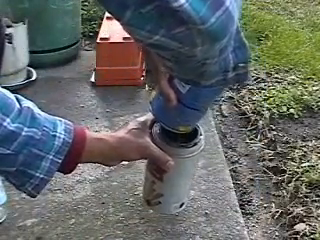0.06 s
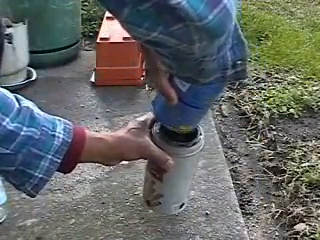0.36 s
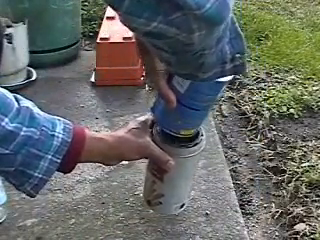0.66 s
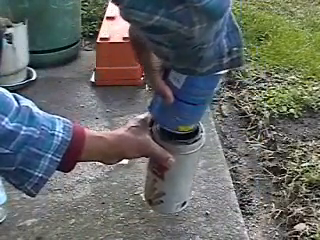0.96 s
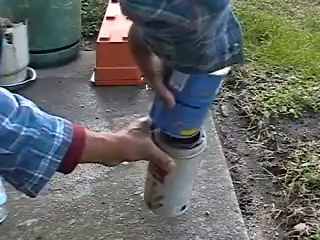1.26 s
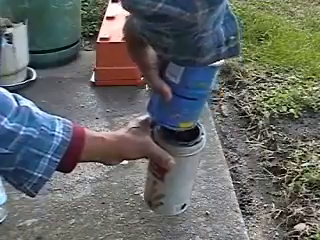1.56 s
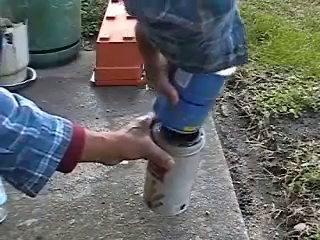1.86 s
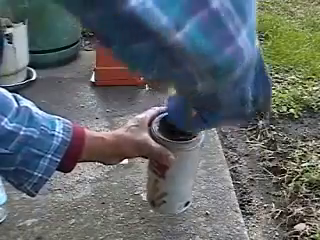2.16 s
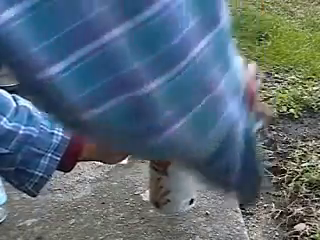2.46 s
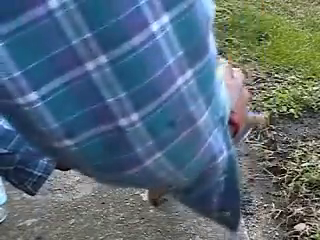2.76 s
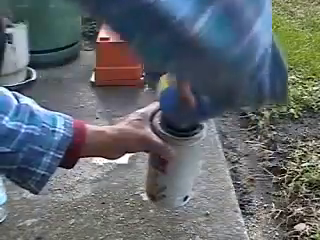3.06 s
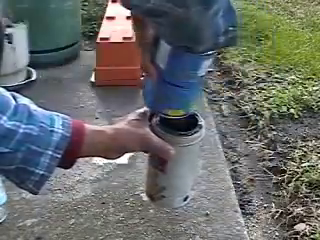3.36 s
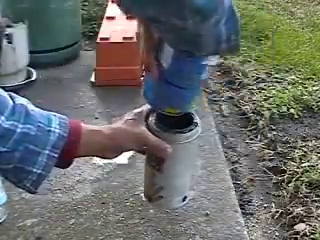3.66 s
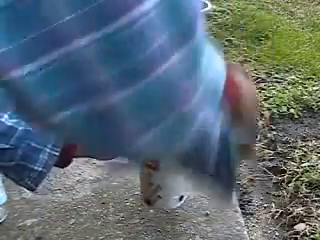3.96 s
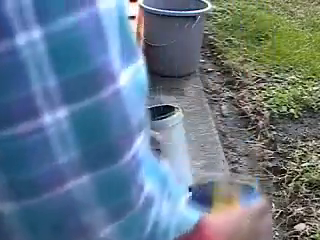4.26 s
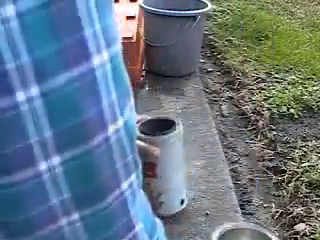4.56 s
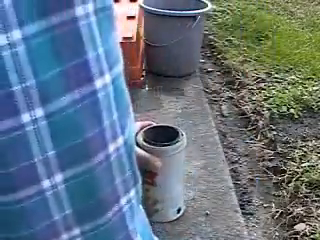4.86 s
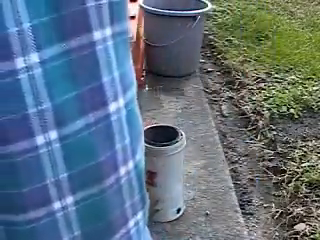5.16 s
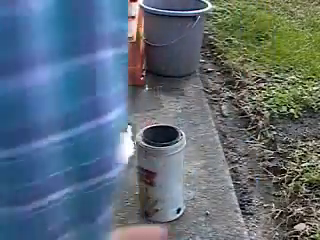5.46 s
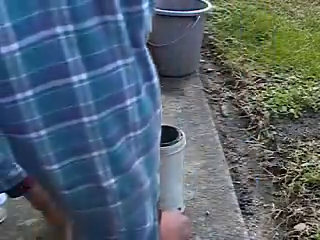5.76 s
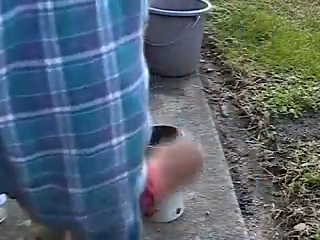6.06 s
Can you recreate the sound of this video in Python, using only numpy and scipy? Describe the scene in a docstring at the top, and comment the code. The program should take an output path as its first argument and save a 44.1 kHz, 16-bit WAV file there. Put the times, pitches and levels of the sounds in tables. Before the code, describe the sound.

A plastic jar shakes rattling pellets into a metal can stove, which rings briefly and is then thumped on the ground.

```python
"""Outdoors, over a distant rumble, wood pellets rattle in a plastic jar and are shaken into a tin-can stove. As
the jar is upended its neck grinds and clinks on the stove, then catches the rim, so that the wall of the can
rings in its modes until a hand damps it. Sleeves brush, and something scrapes over the concrete by stick-slip
friction. Last, the stove is knocked on the ground to settle the fuel: its laden base thuds and the thin tin
clanks."""
import sys
import numpy as np
from scipy import signal
from scipy.fft import rfft, irfft
from scipy.io import wavfile
from scipy.ndimage import uniform_filter1d

SR = 44100
rng = np.random.default_rng(int(sys.argv[2]) if len(sys.argv) > 2 else 0)


def output_pcm(signal):
    """Save a mono or channel-first signal as 16-bit PCM at the path in sys.argv[1].

    Samples are clipped to [-1, 1] before scaling.
    """
    pcm = np.clip(np.atleast_2d(signal).T, -1, 1) * 32767
    wavfile.write(sys.argv[1], SR, np.round(pcm).astype(np.int16))


N = 268564
TIME = np.arange(N) / SR
DETUNE = 0.0075  # relative scatter of resonances with the point of contact

# small pellets striking the jar: t/s, level/dB
RATTLES = [(0.066, -35.5), (0.091, -34.5), (0.2787, -34.5), (0.2945, -39), (0.307, -53), (0.394, -37),
           (0.4035, -36), (0.4203, -31.5), (0.5045, -33), (0.547, -34), (0.584, -33.5), (0.5923, -26),
           (0.605, -29), (0.68, -38), (0.768, -47), (0.9087, -50), (1.16, -43), (1.274, -43), (1.462, -54),
           (1.508, -39), (1.8, -40.5), (1.9927, -42), (2.142, -52), (2.743, -40), (2.943, -45),
           (3.005, -46), (3.46, -35.5), (4.084, -53)]
# knocks of the jar's neck: t/s, level/dB, decay time/s, tilt/(dB/octave), hollow bass/dB, high ring/dB
CLINKS = [(1.051, -41, 0.003, -2.5, -3, 16), (1.2108, -22.5, 0.0036, 6, 11.5, 14),
          (1.3033, -21, 0.0056, 1, 9.5, 15), (1.391, -25, 0.0036, 8.5, 17, -15),
          (1.723, -32.5, 0.0068, 0.5, 10.5, 9), (1.83, -25.5, 0.005, 0.5, 0, 6),
          (1.8335, -14.5, 0.007, 3, -1, 3), (1.846, -20, 0.0068, 3.5, 11, 22),
          (1.868, -29.5, 0.0033, 0, -1, 14), (1.92, -27, 0.018, -1.5, 0, 14),
          (1.936, -27.5, 0.0042, 1, 2, 16), (2.0404, -29, 0.0086, 1.5, -6, 9),
          (2.0686, -36.5, 0.013, -3.5, -4, 12), (2.2277, -26.5, 0.012, -0.5, -5, 23),
          (2.24, -26, 0.011, -0.5, -17, 14), (2.7501, -21, 0.0075, -1.5, 0.5, 19),
          (2.7618, -13, 0.0043, 3, -4, 10), (2.8691, -32.5, 0.0046, -2, -9, 20),
          (3.0795, -27.5, 0.011, 6.5, -4, 7), (3.1006, -30, 0.013, 0.5, -14, 10),
          (3.1608, -28, 0.013, 6.5, 2, 9), (3.274, -24.5, 0.006, 12.5, 26, 19),
          (3.3452, -32.5, 0.0028, -1, -9, 1), (3.37, -32, 0.00063, 0.5, 1, 7),
          (3.393, -22.5, 0.0057, -0.5, -1, 16.5), (3.4227, -21, 0.0078, 1.5, -3.5, 13),
          (4.25, -34, 0.0074, 1, 3, 11)]


def amp(db):
    """Amplitude ratio of a level in decibels."""
    return 10 ** (np.asarray(db) / 20)


def unit(x):
    """Normalisation to an rms of one."""
    return x / np.sqrt(np.mean(x ** 2) + 1e-20)


def add(mix, s, sound):
    """Superposition: a sound joins the mix at time s."""
    part = mix[max(round(s * SR), 0):][:len(sound)]
    part += sound[:len(part)]


def body(x, colour, peaks=(), size=8192):
    """Minimum-phase filter of unit energy: colour (f/Hz, level/dB) plus peaks (f/Hz, width/Hz, gain/dB)."""
    hz = abs(np.fft.fftfreq(size, 1 / SR))
    points, levels = np.transpose(colour)
    db = np.interp(np.log(hz + 1), np.log(points), levels)
    for centre, width, height in peaks:
        db = db + height / (1 + (2 * (hz - centre) / width) ** 2)
    spectrum = np.exp(np.conj(signal.hilbert(np.log(amp(db)))))
    response = np.fft.ifft(spectrum).real[:size // 2]
    return signal.oaconvolve(x, response / np.linalg.norm(response))[:len(x)]


def grains(per_s, spread_db, count):
    """Poisson process: tiny impacts of random moment, sign and size."""
    sizes = amp(spread_db * np.minimum(rng.exponential(1, count), 4)) * rng.choice([-1, 1], count)
    return sizes * (rng.random(count) < per_s / SR)


def burst(db, decay_s, tilt_db, per_s, rise_s, linger, count=6000):
    """Shot noise that swells and decays, with stragglers; db is its energy as a level over 10 ms."""
    t, hz = np.arange(count) / SR, np.fft.rfftfreq(count, 1 / SR)
    envelope = (1 - np.exp(-t / rise_s)) * (np.exp(-t / decay_s) + linger * np.exp(-t / 0.013))
    impacts = np.pad(grains(per_s, 2, count) * envelope, (64, 0))[:count]
    octaves = np.log2(np.clip(hz, 1200, 12000) / 6500)
    tilted = irfft(rfft(impacts) * amp(tilt_db * octaves), count)[64:]
    return amp(db) * tilted / np.linalg.norm(tilted) * np.sqrt(SR / 100)


def swells(rows, rise_db_per_s, fall_db_per_s):
    """Incoherent sum of envelopes that grow and decay exponentially about their peaks (t/s, level/dB)."""
    power = 0
    for s, db in rows:
        drop_db = np.maximum((s - TIME) * rise_db_per_s, (TIME - s) * fall_db_per_s)
        power += amp(db - drop_db.clip(0, 120)) ** 2
    return np.sqrt(power)


def air():
    """Filtered noise: a distant rumble whose narrow peaks give a low hum and a faint high tone."""
    # outdoor spectrum: f/Hz, level/dB
    colour = [(15, -49), (25, -10), (97, -0.5), (383, -12), (953, -8.5), (2130, -17.5), (2370, -24),
              (5440, -37), (11000, -30), (12500, -44.5), (22000, -110)]
    # its peaks: f/Hz, width/Hz, gain/dB
    peaks = [(102.8, 6.5, 9.2), (180, 137, 2.75), (2362, 18, 22.3)]
    return amp(-47) * unit(body(rng.standard_normal(N), colour, peaks))


def flow():
    """Granular flow: the wake of each jolt, the slides of the heap and a slow creep add in power."""
    # tilts of the jar that let the heap slide: t/s, level/dB
    tilts = [(0.395, -41), (0.56, -38.5), (1.163, -38), (1.286, -31.5), (1.71, -44), (1.93, -48),
             (2.145, -40.5), (2.365, -43), (2.605, -49), (2.82, -32), (3.49, -41.5)]
    creep_db, pour_end_s = -64.5, 2.9
    # a harder jolt loosens more pellets
    jolts = [(s, -44.5 + 0.5 * (db + 31)) for s, db, *_ in RATTLES + CLINKS]
    wakes = swells(jolts, rise_db_per_s=789, fall_db_per_s=226)
    slides = swells(tilts, rise_db_per_s=335, fall_db_per_s=190)
    return np.sqrt(wakes ** 2 + slides ** 2 + amp(creep_db) ** 2 * (TIME < pour_end_s))


def trickle(level):
    """Modulated shot noise: sliding wood catches and slips in clumps over a thin bed of grains."""
    clump_s, bed = 0.0025, 0.3
    contacts = abs(grains(per_s=300, spread_db=-1, count=N))
    clumps = bed + signal.lfilter([1], [1, -np.exp(-1 / (clump_s * SR))], contacts)
    return level * unit(clumps * grains(per_s=9000, spread_db=2.5, count=N))


def pellets(running):
    """Source and filter: rattles and trickle excite the hollow plastic jar, and heavier pieces clack."""
    # response of the jar: f/Hz, level/dB
    colour = [(100, -29), (450, 3.5), (850, -7.5), (1500, 5.5), (2800, 2), (5200, -5), (6700, 2.5),
              (9000, 0.5), (12500, -1.5)]
    # its resonances: f/Hz, width/Hz, gain/dB
    peaks = [(1680, 300, 2.3), (2297, 49, 5.9), (3280, 55, 11.4), (8340, 270, 2.8)]
    # heavy pieces striking its wall, and at 4.109 s the jar knocking as it is set down: t/s, level/dB, f/Hz
    heavy_hits = [(0.066, -13.5, 1730), (0.0917, -6.5, 1830), (0.107, -10, 1700), (0.1425, -9, 1600),
                  (0.354, -18.5, 1750), (0.5924, -18, 2030), (0.606, -3.5, 1580), (0.6804, -13, 1740),
                  (0.7184, -8, 1700), (0.766, -12, 2200), (0.7823, -7.5, 1800), (0.815, -15.5, 1600),
                  (0.891, -14, 1640), (0.938, -19.5, 1700), (1.305, -22, 1480), (1.508, -14.5, 1460),
                  (1.9933, -11.5, 1660), (2.04, -9.5, 2300), (2.07, -11, 1585), (3.484, -10, 1790),
                  (3.506, -8, 1890), (4.109, -16.5, 1960)]
    drive, clacks = amp(5.5) * trickle(running), np.zeros(N)
    for s, db in RATTLES:
        tilt_db = 0.04 * (db + 63)  # harder is brighter
        rattle = burst(db, decay_s=0.0051, tilt_db=tilt_db, per_s=10000, rise_s=0.0003, linger=0.17)
        add(drive, s, amp(4.5) * rattle)
    for s, db, hz in heavy_hits:
        add(clacks, s, clack(db, hz))
    return body(drive, colour, peaks) + clacks


def clack(db, hz, count=4096):
    """Impact with rebounds: a hard piece excites its own pitch and the jar's wall; its edge crunches."""
    # spectrum of the impact: f/Hz, level/dB
    colour = [(100, -48), (900, -12), (1500, 0), (3200, -9), (4500, -34), (12500, -24)]
    # resonances of the jar's wall: f/Hz, width/Hz, gain/dB
    wall_peaks = [(2340, 180, 10), (3305, 130, 12)]
    hit = 0.13 * grains(per_s=5300, spread_db=-1.5, count=count) * np.exp(-np.arange(count) / SR / 0.012)
    hit[0] = 1  # first contact, ahead of the chatter
    crunch = burst(-35.5, decay_s=0.0034, tilt_db=0.5, per_s=10000, rise_s=0.0005, linger=0.1)[:count]
    peaks = [(centre * (1 + 2 * DETUNE * rng.standard_normal()), width, height)
             for centre, width, height in wall_peaks]
    return amp(db) * (body(hit, colour, peaks + [(hz, 240, 11)]) + crunch)


def neck(running):
    """Damped resonance: the hand-held jar's neck chatters on the stove, each contact in its own colour."""
    # response of the neck: f/Hz, level/dB
    colour = [(100, -21.5), (430, -6.5), (800, -6.5), (1500, -6), (2700, -5.5), (3800, 1), (5300, -2.5),
              (7600, 1), (10000, -2), (12500, -3.5)]
    # its resonances and dips: f/Hz, width/Hz, gain/dB
    resonances = [(430, 80, 14), (615, 60, 13.5), (1065, 60, 13.5), (1593, 350, 14.5), (3076, 120, 8),
                  (3528, 190, 11), (4120, 240, 7), (4600, 255, 3), (5490, 290, -11), (6600, 210, -4),
                  (7770, 530, 5)]
    # loose grains stir the resonances less than a knock does
    weaker = [(hz, width, 0.98 * db) for hz, width, db in resonances]
    sound = amp(-0.5) * body(trickle(running), colour, weaker)
    for s, db, decay_s, tilt_db, hollow_db, ring_db in CLINKS:
        peaks = np.array(resonances + [(6175, 260, ring_db), (450, 350, hollow_db)])
        peaks[:, 0] *= 1 + DETUNE * rng.standard_normal(len(peaks))
        knock = burst(db, decay_s, tilt_db, per_s=11000, rise_s=0.0013, linger=0.062)
        add(sound, s, amp(0.5) * body(knock, colour, peaks))
    return sound


def mode(hz, t60, count):
    """Free vibration of a damped oscillator, falling by 60 dB in t60 seconds."""
    t = np.arange(count) / SR
    return np.sin(2 * np.pi * hz * t) * 10 ** (-3 * t / t60)


def stove(count=32000):
    """Modal superposition: a blow cracks, rings the wall and thumps the base; dense high modes clank."""
    # blows: t/s, place (0 rim, 1 foot), wall ring/dB, base thud/dB, crack/dB, build-up of the thud/s
    blows = [(2.7635, 0, -24.5, -36, -26, .0003), (2.8676, 0, -31.5, -58, -58, .0003),
             (4.7717, 0.3, -48, -6.5, -13.5, .0003), (4.852, 1, -56, -15, -44, .006),
             (4.887, 1, -56, -16, -39, .007), (4.9475, 1, -56, -12, -31, .002),
             (4.96, 1, -62, -11.5, -39, .003), (5.1085, 1, -19.5, -24, -19, .0003),
             (5.119, 1, -40, -21, -42, .002), (5.133, 1, -48, -12, -55, .003),
             (5.242, 1, -52, -27, -52, .006)]
    # modes of the can's wall: f/Hz, T60/s, level struck at the rim/dB, level struck at the foot/dB
    wall_modes = [(470, 0.4, -17, 7), (614, 0.36, -4.5, 0), (941.5, 1.15, -2, 0.5), (1076.5, .56, 2, 0),
                  (1525, .8, -6, -14), (1840, .72, -2, -3.5), (2097, 0.48, -16, -1), (2754, 0.38, -10, -36),
                  (3605, 0.48, -7, -22), (4204, .36, -14, -30), (5023, 0.32, -11, -22),
                  (5535, .36, -17, -26)]
    # modes of the fuel-laden base: f/Hz, level/dB, T60/s
    base_modes = [(455, -5.5, 0.085), (532.5, 2, 0.055), (578, 2, 0.02), (1173, -2, 0.05)]
    # spectrum of the contact crack: f/Hz, level/dB
    crack_colour = [(100, -12), (500, 16.5), (1200, 23.5), (2100, 6), (3300, 1), (4800, -32), (6200, -9),
                    (9300, -3), (12500, -6)]
    # response of the thin tin: f/Hz, level/dB
    tin_colour = [(300, -48), (1300, 16.5), (2200, 8), (2850, -9), (3400, 3.5), (4900, 0.5), (6600, -7.5),
                  (12000, -2.5)]
    # its resonances: f/Hz, width/Hz, gain/dB
    tin_peaks = [(3500, 200, 6.9), (5560, 450, 10), (7870, 480, 16), (9260, 370, 15)]
    grip_s, grip_db_per_s = 3.2, 54  # the hand tightens and damps the ring
    softening_db = 2.5  # a slow push stirs upper modes less: loss per extra cycle within the build-up
    overtone_t60, lowest_hz = 0.26, base_modes[0][0]
    metal, cracks, clanks = np.zeros((3, N))
    t = np.arange(count) / SR
    push = 1 - np.exp(-t / 0.0007)  # the contact force takes a moment to build
    overtones = sum(rng.choice([-1, 1]) * mode(hz, overtone_t60, count)
                    for hz in rng.uniform(3105, 11870, size=70))
    for s, foot, wall_db, base_db, crack_db, build_s in blows:
        sag, damping = 1 - 0.01 * foot, 1 + 2.4 * foot  # on the ground the wall rings lower and shorter
        wall = sum((-1) ** k * amp(rim_db + foot * (foot_db - rim_db))
                   * mode(hz * sag, t60 / damping, count)
                   for k, (hz, t60, rim_db, foot_db) in enumerate(wall_modes))
        thud = sum((-1) ** k * amp(db - softening_db * build_s * (hz - lowest_hz)) * mode(hz, t60, count)
                   for k, (hz, db, t60) in enumerate(base_modes))
        jitter = unit(uniform_filter1d(rng.standard_normal(count), size=260))
        buzz = 1 + 0.25 * (1 - foot) * jitter  # loose fuel buzzes on the ringing wall
        grip = amp(-grip_db_per_s * np.maximum(s + t - grip_s, 0) * (s < grip_s))
        add(metal, s, amp(wall_db) * push * buzz * grip * wall)
        add(metal, s, amp(base_db) * (1 - np.exp(-t / build_s)) * thud)
        # only a hard knock shakes the slab
        add(metal, s, amp(2 * crack_db + 3) * mode(hz=45.3, t60=0.029, count=4000))
        crack = burst(crack_db, decay_s=0.003, tilt_db=2, per_s=12000, rise_s=0.0014, linger=0.027)
        add(cracks, s, crack)
        clash_db = wall_db - 2 - 2 * foot
        clash = burst(clash_db, decay_s=0.003, tilt_db=0, per_s=30000, rise_s=0.0004, linger=0.08)
        damped = overtones * amp(-60 * t * (damping - 1) / overtone_t60)
        add(clanks, s, clash)
        add(clanks, s, 0.0072 * signal.fftconvolve(clash, damped))
    # the jar's neck grazes the wall and renews one mode
    add(metal, s=3.105, sound=amp(-34) * push * mode(hz=1825, t60=0.37, count=count))
    return metal + body(cracks, crack_colour) + body(clanks, tin_colour, tin_peaks)


def sleeves():
    """Friction noise: flannel fibres brush in a soft, grainy hiss."""
    # arm movements at their peaks: t/s, level/dB
    strokes = [(3.8, -66.5), (4.24, -51.5), (5.72, -62)]
    colour = [(300, -12), (1800, -5), (3300, 1), (5000, -7.5), (8000, 0.5), (12000, -4)]
    fibres = unit(grains(per_s=1400, spread_db=-6, count=N))
    return body(swells(strokes, rise_db_per_s=35, fall_db_per_s=29) * fibres, colour)


def scrape():
    """Stick-slip friction: one dying push drives fixed resonances; the lowest groans, and sand snaps."""
    # spectrum of the rasp on concrete: f/Hz, level/dB
    colour = [(100, -24), (330, -7), (550, 2.5), (1000, 4), (1400, 2.5), (1950, 3.5), (2400, -9.5),
              (3300, -22), (4000, -27.5), (12000, -34)]
    # its resonances: f/Hz, width/Hz, gain/dB
    peaks = [(577, 32, 12.7), (740, 15.4, 15.4), (905, 13, 13), (1006, 41, 13.3), (1638, 50, 7.9)]
    # groans where the sliding sticks: t/s, level/dB
    groans = [(4.245, -29), (4.41, -40.5)]
    slip_hz = 150 * np.exp(0.42 * unit(uniform_filter1d(rng.standard_normal(N), size=250)))
    slip_count = np.floor(np.cumsum(slip_hz) / SR)
    slips = np.diff(slip_count, prepend=0) * rng.uniform(0.42, 1, N)
    drive = unit(slips) + 3.5 * unit(grains(per_s=2000, spread_db=-0.5, count=N))
    sand = grains(per_s=120, spread_db=2, count=N)
    snaps = unit(body(sand, [(1000, 7), (3200, 12), (5000, -12), (12000, -25)], [(3270, 430, 3)]))
    rasp = unit(body(drive, colour, peaks)) + amp(-20) * snaps
    groan = unit(body(drive, [(150, -8), (440, 6), (900, -50)], [(440, 49, 16)]))
    push = swells([(4.255, -27)], rise_db_per_s=233, fall_db_per_s=60)
    return rasp * push + groan * swells(groans, rise_db_per_s=335, fall_db_per_s=277)


def yard(x, t60, colour, count=12000):
    """Scattering: the slab, pots and walls return exponentially decaying echoes."""
    t = np.arange(count) / SR
    taps = grains(per_s=2900, spread_db=2.5, count=count) * (t > 0.004) * 10 ** (-3 * t / t60)
    return signal.oaconvolve(body(x, colour), unit(taps) / np.sqrt(count))[:N]


def scene():
    """Mid-side stereo: all lies ahead; only echoes and the air above the bass differ between the ears."""
    upend_s, upend_length_s = 0.9, 0.2  # the flow moves from the jar's belly to its neck
    in_neck = 0.9 * np.clip((TIME - upend_s) / upend_length_s, 0, 1)
    running = flow()
    jar = pellets(running * np.sqrt(1 - in_neck)) + neck(running * np.sqrt(in_neck))
    near = jar + stove() + scrape() + sleeves()
    mid = near + amp(-18) * yard(near, t60=0.17, colour=[(200, 1.5), (2000, -1.5), (12000, -19.5)]) + air()
    diffuse = signal.lfilter(*signal.butter(1, 450, "high", fs=SR), air())
    side = amp(-37) * yard(near, t60=0.027, colour=[(3500, 5), (12000, -30)]) + amp(-11) * diffuse
    return np.array([mid + side, mid - side])


def record(dry):
    """Band limiting: a linear-phase low-pass removes the highest treble."""
    low_pass = signal.firwin(255, cutoff=12550, window=("kaiser", 8), fs=SR)
    return signal.oaconvolve(dry, low_pass[None], "same", axes=1)


dry = scene()
out = record(dry)
output_pcm(out)
```